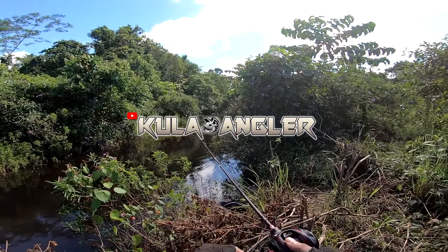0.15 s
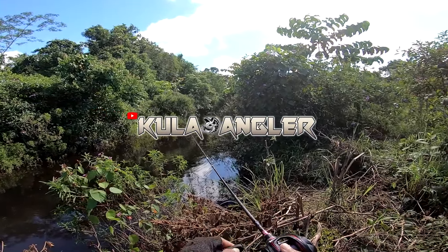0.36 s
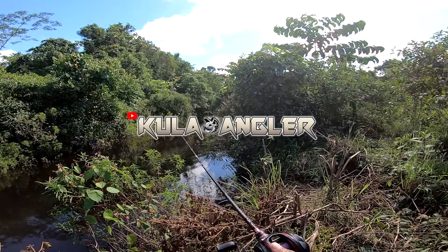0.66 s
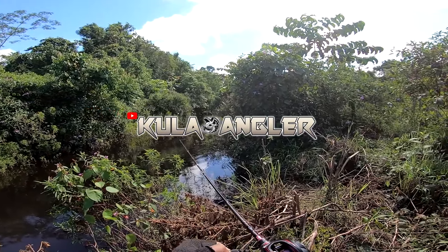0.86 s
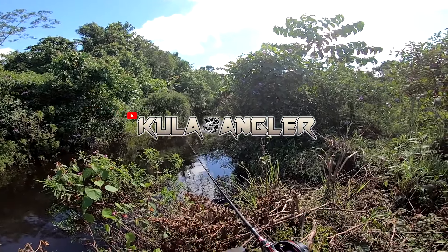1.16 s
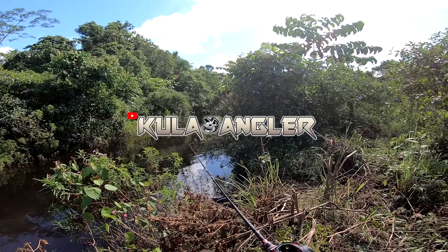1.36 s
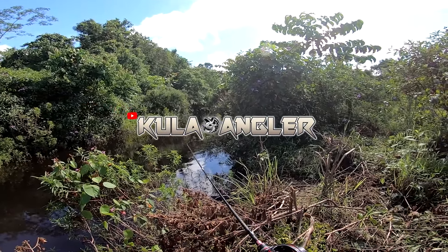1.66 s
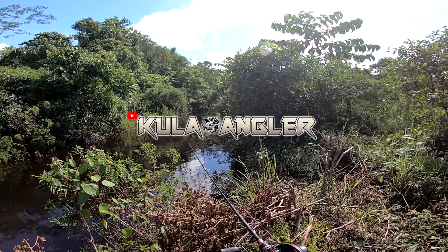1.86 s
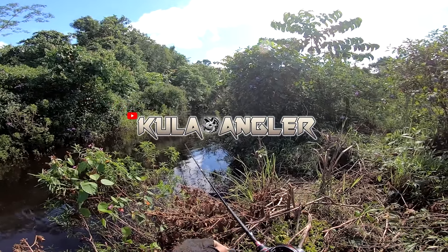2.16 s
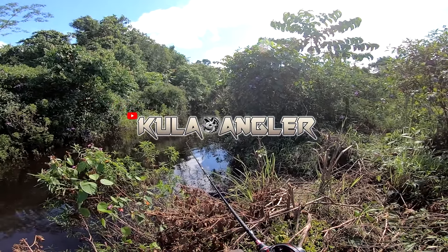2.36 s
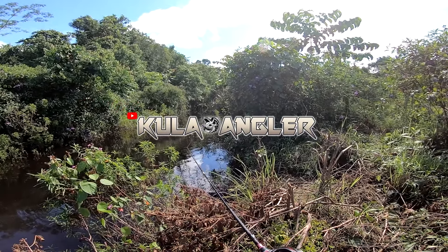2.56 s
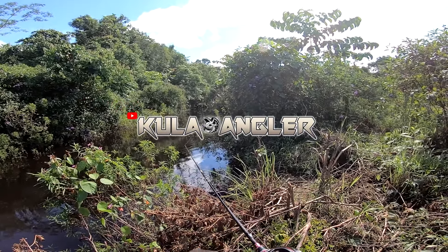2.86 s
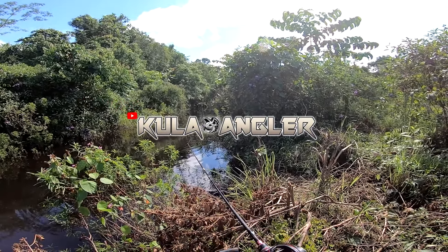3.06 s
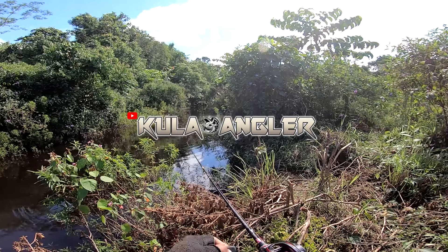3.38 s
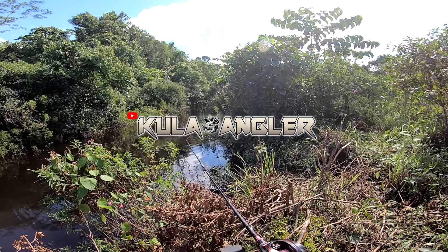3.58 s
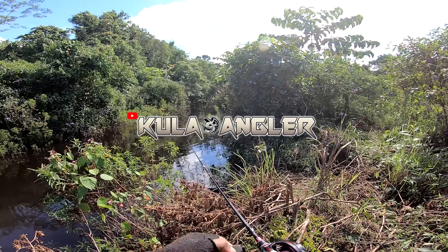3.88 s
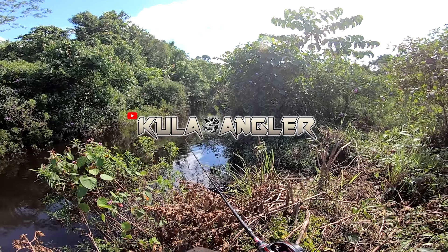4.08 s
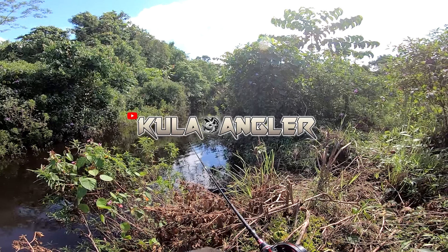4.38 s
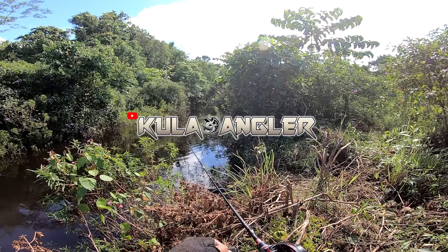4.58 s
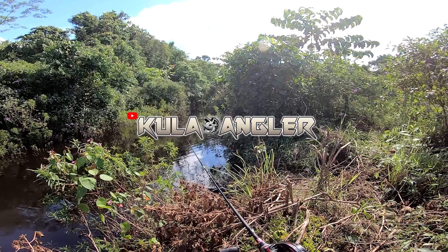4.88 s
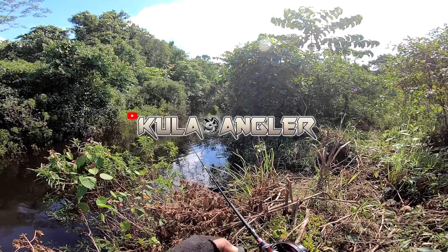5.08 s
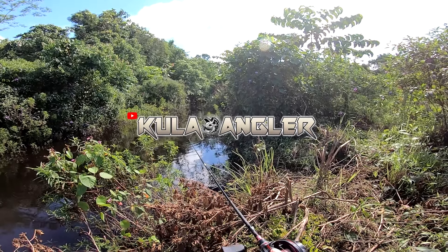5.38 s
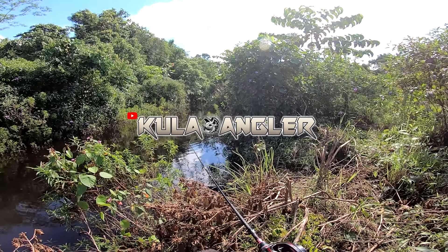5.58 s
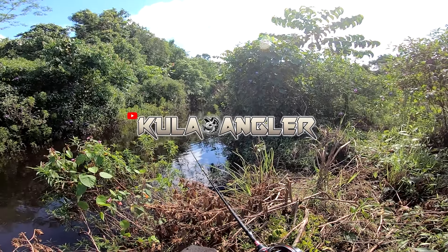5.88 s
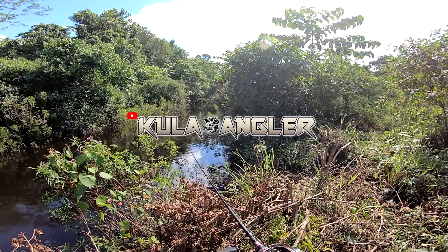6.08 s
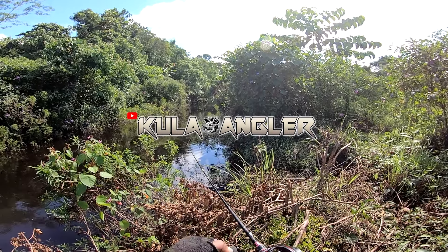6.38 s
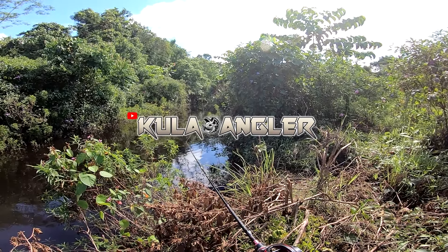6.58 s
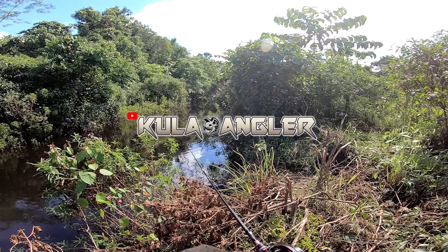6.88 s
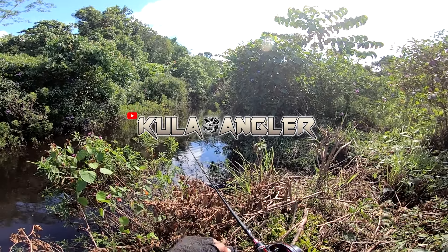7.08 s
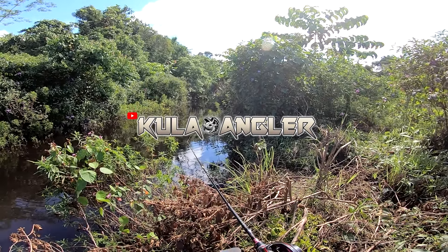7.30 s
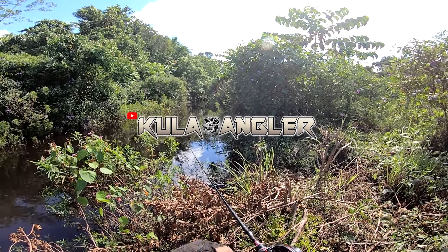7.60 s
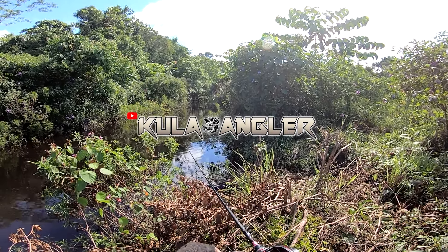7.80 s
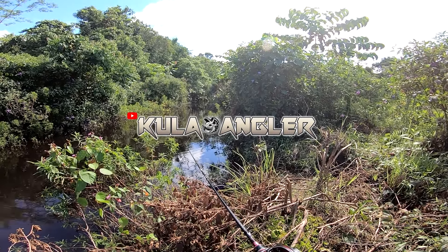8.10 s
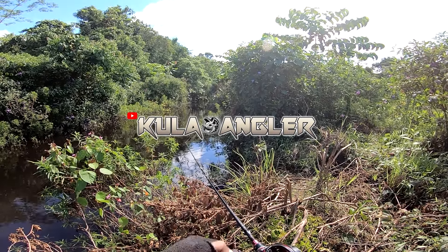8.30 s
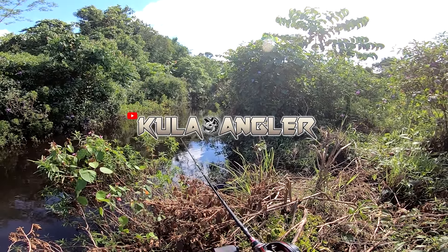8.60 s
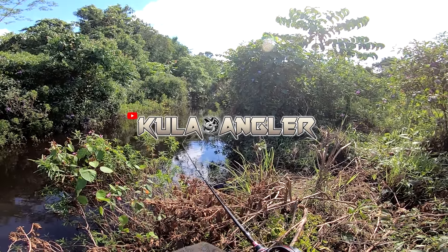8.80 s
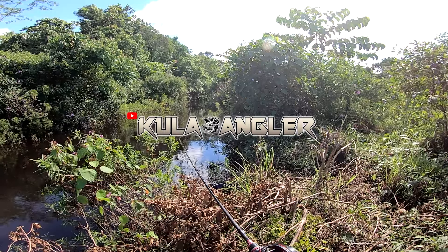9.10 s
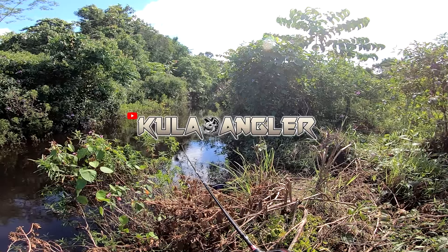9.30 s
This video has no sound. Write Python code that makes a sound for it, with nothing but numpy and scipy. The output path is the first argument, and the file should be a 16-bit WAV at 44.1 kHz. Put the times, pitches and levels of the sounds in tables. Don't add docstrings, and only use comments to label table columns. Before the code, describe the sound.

Shrill insects shimmer continuously beside still water while a fishing reel clacks, drops plink, a frog chirps evenly, birds chatter and handling bumps the camera.

```python
import sys
import numpy as np
from scipy import signal
from scipy.fft import rfft, irfft, next_fast_len
from scipy.io import wavfile

SR = 44100
rng = np.random.default_rng(int(sys.argv[2]) if len(sys.argv) > 2 else 0)


def wav_out(sig):
    wavfile.write(sys.argv[1], SR, np.round(np.clip(np.atleast_2d(sig).T, -1, 1) * 32767).astype(np.int16))


def makeup_ratio(level_db):
    decades = np.asarray(level_db, float) / 20
    return 10 ** decades


N = 416744
T = np.arange(N) / SR

# pitch in Hz, time to fade by 60 dB in s, left in dB, right in dB.
CHORUS_TONES = [(6800, 0.0093, -9.5, -28), (6870, 0.0088, 6.5, -30), (6870, 0.02, 4.5, -18),
                (7080, 0.0098, -1, 0.5), (7243, 0.017, 1.5, -9), (7650, 0.0026, 4.5, -2.5),
                (7796, 0.0055, -6, -27)]
# time in s, throb number.
THROB_TIMES = [(0, 0.5), (2.0, 40.46), (4.75, 95.0), (6.25, 124.93), (6.75, 134.72), (9.45, 188.58)]
# pitch in Hz, level in dB per Hz.
FAR_INSECT_COLOUR = [(3300, -16), (4100, -8), (4700, -4), (5200, -2.1), (5900, -4), (6300, -9), (8000, -1),
                     (8500, -6), (9500, -7), (9800, -11), (10400, -27), (11200, -34)]
# start in s, length in s, level in dB.
SIZZLE_BOUTS = [(0, 0.45, -93), (1.6, 0.22, -95), (2.3, 0.89, -98), (3.57, 0.7, -101), (4.68, 0.48, -102),
                (5.24, 0.08, -91), (5.5, 0.15, -100), (5.78, 0.055, -93), (5.97, 0.27, -101),
                (6.45, 0.4, -102), (6.95, 0.14, -94), (7.4, 0.51, -91), (8.53, 0.33, -93), (9.0, 0.5, -94)]
# time in s, chirp number.
NEAR_CHIRPS = [(0.024, 0), (2.007, 30), (6.963, 105), (9.482, 143)]
# time in s, chirp number.
FAR_CHIRPS = [(0.031, 0), (9.464, 142)]
# from in s, to in s.
CHIRP_PAUSES = [
    (2.66, 2.77),
    (3.76, 3.89),
]
FROG_CALLS = [1.286, 1.628, 2.006, 2.365, 2.736, 3.09, 3.464, 3.82, 4.184, 4.551, 4.912, 5.279, 5.667,
              6.037, 6.413, 6.784, 7.156, 7.524, 7.916, 8.301, 8.67, 9.052, 9.417]
# time in s, level in dB, centre pitch in Hz.
AHEAD_NOTES = [(0.02, -54, 2700), (0.115, -50, 3050), (0.132, -51, 2450), (0.2, -52, 3150),
               (0.3, -49.5, 3020), (0.4, -48, 3020), (0.54, -53.5, 3050), (0.565, -52, 3150),
               (0.653, -50, 3030), (0.771, -50, 3050), (0.9, -51, 3200), (4.988, -49, 2250)]
# time in s, level in dB, centre pitch in Hz.
RIGHT_NOTES = [(4.571, -52, 2530), (4.67, -49.5, 2470), (4.775, -48.5, 2490), (4.877, -44, 2660),
               (4.95, -44, 2660), (5.068, -46, 2320), (5.161, -42, 2570), (5.245, -44.5, 2520),
               (5.285, -55, 3100), (5.348, -46, 2360), (5.436, -44, 2570), (5.545, -43.5, 2480),
               (5.635, -46.5, 2410), (5.703, -47, 2670), (5.832, -50.5, 2460), (5.965, -48.5, 2560),
               (6.13, -49, 2710), (6.349, -55, 2630)]
# time in s, level in dB, centre pitch in Hz.
LEAF_RUSTLES = [(0.02, -59, 3100), (0.29, -56.5, 3000), (0.72, -58, 2000), (1.55, -63, 1113),
                (9.1, -61, 1495), (8.6, -70, 1300), (8.57, -61, 2730), (8.78, -58, 2600),
                (8.84, -58.5, 1600), (9.4, -57.5, 2700), (6.3, -73, 1400)]
# time in s, pitch in Hz, level in dB.
HOOT_GLIDE = [(0.42, 260, -71), (0.47, 287.4, -50), (0.55, 307.3, -52.5), (0.64, 292, -63),
              (0.72, 287, -64), (0.88, 284.4, -68), (0.93, 290, -55), (0.99, 278.6, -75)]
# time in s, peak in dB, pitch in Hz.
WATER_DROPS = [(1.305, -31, 734), (1.317, -32.5, 656), (1.343, -36.5, 620), (1.372, -39.5, 705),
               (1.45, -40.5, 816), (1.498, -42, 950), (1.63, -33.5, 810), (1.686, -38.5, 980),
               (1.699, -35, 820), (1.715, -34.5, 720), (1.762, -30.5, 754), (1.775, -39, 820),
               (1.87, -44, 706), (1.97, -40, 820), (1.986, -39, 960), (2.226, -44.5, 1390),
               (3.939, -52, 610), (5.829, -46, 1830), (7.659, -43.5, 1186), (8.868, -45, 2020),
               (7.512, -44, 900), (1.909, -44, 1050), (1.93, -55, 1040)]
# start in s, length in s, level in dB, first Hz, last Hz.
PIPE_GLIDES = [
    (1.495, 0.037, -51, 910, 980),
    (1.635, 0.037, -49, 883, 780),
    (2.246, 0.035, -60, 2060, 2080),
    (2.303, 0.12, -53.5, 402, 390),
    (8.553, 0.02, -56, 960, 980),
    (8.58, 0.024, -54, 990, 1010),
    (8.772, 0.062, -61, 956, 1070),
    (8.813, 0.071, -57, 1790, 2100),
]
# time in s, peak in dB, ring in Hz.
LATCH_CLICKS = [(0.2292, -25.5, 820), (0.23, -30, 1520), (0.256, -30, 2900), (0.2659, -12.5, 2700),
                (0.267, -11.5, 2760), (0.2671, -15.5, 1680), (0.2753, -31, 2900), (0.2774, -11.5, 2580),
                (0.2776, -28, 1820), (0.262, -34, 2600), (0.2688, -24, 2900), (0.2722, -26, 2900),
                (0.2746, -21, 2900), (0.2845, -43, 2300), (0.2859, -29, 3280), (0.2674, -17, 6800),
                (0.2696, -12, 6800), (0.2675, -23, 3950), (0.269, -21, 4660), (0.3362, -24, 2940),
                (0.3382, -20.5, 2920), (0.3390, -25.5, 810), (0.34, -28.5, 1810), (0.353, -27, 303),
                (0.2660, -31, 376)]
# start in s, length in s, level in dB.
LEVER_SCRAPES = [
    (0.246, 0.039, -40.5),
    (0.263, 0.01, -29),
    (0.285, 0.039, -55),
]
# pitch in Hz, level in dB, time to fade by 60 dB in s.
REEL_TONES = [(1630, 8.5, 0.0015), (2300, 5, 0.0032), (2900, -0.5, 0.0067), (3950, -2, 0.0038),
              (6700, -5, 0.0019), (9400, -15, 0.0042), (11300, -13.5, 0.005)]
# time in s, peak in dB, pitch in Hz, left minus right in dB.
HARD_TICKS = [(1.887, -39, 1820, 16), (1.8873, -43, 3000, 3), (3.639, -45, 2710, 3.5),
              (3.721, -41, 2670, 3.0), (4.04, -46, 3800, 1), (2.74, -49, 3100, 2), (6.7694, -42, 4300, 4),
              (6.7696, -42, 2600, 4), (4.31, -40, 4160, 2), (4.3566, -37.5, 5000, 13),
              (5.2273, -49, 5300, 0), (5.525, -38, 3550, -4.0), (6.769, -41, 3300, 4),
              (2.0996, -39, 322, 3), (8.125, -56, 4600, -8), (8.743, -54, 4800, 2.1),
              (6.7692, -42, 5500, 5)]
# time in s, peak in dB, pitch in Hz, left minus right in dB.
TWIG_SNAPS = [(8.532, -42, 2700, 2), (8.552, -42, 2860, 0), (8.574, -38, 2520, 2.5),
              (8.825, -41, 2300, 4.5), (8.89, -43, 2200, 2), (1.333, -41, 1700, 0), (1.375, -42, 2400, 0),
              (8.741, -42, 2100, 7), (8.767, -39, 2590, 3.5), (8.798, -40, 2600, 5), (8.87, -40, 2700, 1.5),
              (8.91, -51, 2700, 2.5), (9.086, -44, 3500, 1.1), (9.384, -40, 2800, 0.6),
              (8.201, -45, 2400, 0.6), (7.707, -46, 2640, 0.6), (4.941, -40, 2550, -7),
              (7.256, -46, 1390, 3), (5.607, -42, 2400, -3), (3.336, -43, 2600, 0), (3.23, -46, 2300, 0),
              (3.288, -46, 1900, 0), (6.96, -50, 1600, 2)]
# time in s, peak in dB.
CASE_KNOCKS = [
    (2.099, -12),
    (4.357, -8.5),
    (5.227, -11),
]
# time in s, length in s, level in dB.
CLOTH_RUBS = [(2.273, 0.032, -55), (2.693, 0.052, -65), (3.092, 0.042, -68), (3.227, 0.1, -58),
              (3.462, 0.24, -64), (3.69, 0.068, -49.5), (4.184, 0.082, -62), (4.35, 0.084, -55),
              (4.5, 0.051, -74), (4.877, 0.031, -57), (4.988, 0.05, -53.5), (5.268, 0.066, -35),
              (6.152, 0.16, -70), (6.759, 0.14, -56), (6.968, 0.078, -50), (7.536, 0.065, -51),
              (7.74, 0.095, -53.5), (8.572, 0.065, -51), (9.243, 0.074, -56), (9.375, 0.12, -50)]
# pitch in Hz, level in dB, time to fade by 60 dB in s.
CASE_TONES = [(423, -11, 0.02), (990, 1, 0.016), (1600, -26, 0.04), (1660, -9.5, 0.0028),
              (2280, -23, 0.029), (2920, -15.5, 0.015)]
# time in s, peak in dB, pitch in Hz.
FINGER_THUMPS = [(0.11, -47, 65), (0.249, -49, 80), (0.36, -44.5, 75), (0.84, -55, 45), (1.09, -57, 75),
                 (1.32, -52, 85), (1.66, -55, 95), (1.79, -46, 75), (2.06, -56, 55), (2.12, -47, 75),
                 (2.44, -52, 45), (3.56, -55, 80), (3.95, -52, 70), (5.1, -61, 50), (5.28, -54, 60),
                 (5.76, -49, 60), (6.13, -50, 55), (7.25, -52, 55), (7.45, -51, 65), (7.81, -54, 50),
                 (7.98, -45, 70), (8.35, -51, 60), (8.77, -47, 56.4), (9.079, -47, 50), (9.33, -47, 50.4)]
# time in s, level in dB.
MOTOR_LEVEL = [(0, -55.5), (0.1, -56), (0.5, -55.5), (1.05, -58.5), (1.22, -62), (1.32, -52.5),
               (1.52, -55.5), (1.8, -55.5), (2.1, -55), (2.45, -58.5), (2.55, -65.5), (3.18, -64),
               (3.84, -63), (4.4, -70), (5.0, -68.5), (5.87, -70.5), (6.3, -76.5), (9.45, -70.5)]
# pitch in Hz, level in dB per Hz.
LOW_AIR_COLOUR = [(59, -48), (112, -5.5), (152, 2.5), (444, -8), (713, -5), (932, -14.5), (1300, -14.5),
                  (1690, -21.5), (2860, -120)]
# pitch in Hz, level in dB per Hz.
HIGH_AIR_COLOUR = [(530, -3), (900, 0.5), (1140, -1.5), (1310, 3.5), (2120, -1.5), (2380, 0), (2670, 4),
                   (4200, -14.5), (5460, -30), (9240, -120)]
# pitch in Hz, likeness from 0 to 1.
AIR_LIKENESS = [(60, .95), (150, 0.76), (400, 0.67), (800, 0.39), (1300, 0.14), (2700, 0.75), (3900, 0.54),
                (4700, 0.7), (6000, 0.046)]
# pitch in Hz, left minus right in dB.
AIR_LEAN = [(200, -0.5), (700, -3), (1300, 0), (2500, 2.5), (4000, -0.5), (5200, 7.5), (8800, 7),
            (10000, -5), (12000, -21)]
# time in s, level in dB.
WIND_GUSTS = [(0.1, -65), (0.35, -66), (1.1, -75), (1.79, -71), (2.11, -64), (2.45, -81), (3.1, -66),
              (3.53, -68), (3.97, -59), (4.4, -64), (5.26, -60), (5.76, -60), (6.1, -60), (6.65, -57.5),
              (7.21, -60), (7.7, -59.5), (7.98, -66), (8.37, -55), (8.76, -58.5), (9.14, -51),
              (9.34, -62.5)]
# time in s, side level in dB.
STEREO_OPENING = [
    (0, -36.5),
    (1.85, -35.5),
    (2.0, -13.5),
    (2.2, -6.5),
    (2.6, -4),
    (3.4, -0.5),
    (9.45, 0.5),
]
# pitch in Hz, level in dB.
WIND_MODE_COLOUR = [(650, 0.63), (1050, 0), (1600, 3), (3000, 4.5), (4200, 7), (5200, -2), (5700, -2),
                    (5950, -0.5), (6600, -1.2), (8800, 0.1), (9200, 4), (9600, 2.5), (10600, 10.5),
                    (11200, 3)]


def rms_one(x):
    return x / np.sqrt(np.mean(x ** 2) + 1e-20)


def in_time(rows):
    s, *columns = np.transpose(rows)
    return [np.interp(T, s, column) for column in columns]


def at_hz(points, hz):
    table_hz, value = np.array(points)[:, 0], np.array(points)[:, 1]
    return np.interp(np.log(hz), np.log(table_hz), value)


def drift(rate):
    step = 40
    r = np.exp(-2 * np.pi * step * rate / SR)
    noise = rng.standard_normal(N // step + 2002)
    slow = signal.lfilter([1], [1, -2 * r, r * r], noise)[2000:]
    return np.interp(np.arange(N) / step, np.arange(len(slow)), rms_one(slow))


def low_pass(x, hz):
    return signal.sosfilt(signal.butter(4, min(hz, .45 * SR), fs=SR, output="sos"), x)


def band_pass(x, order, low_hz, high_hz):
    return signal.sosfilt(signal.butter(order, [low_hz, high_hz], "band", fs=SR, output="sos"), x)


def ring(clicks, hz, t60):
    r, w = makeup_ratio(-60 / (t60 * SR)), 2 * np.pi * hz / SR
    return signal.lfilter([0, np.sin(w)], [1, -2 * r * np.cos(w), r * r], clicks + 1e-18)


def add(out, s, sound, lean_db=0):
    i = int(np.clip(s * SR, 0, N))
    out[:, i:i + len(sound)] += sound[:N - i] * makeup_ratio(np.array([[lean_db / 2], [-lean_db / 2]]))


def grains(per_s, spread_db, size):
    heights = makeup_ratio(spread_db * np.minimum(rng.exponential(1, size), 5)) * rng.choice([-1, 1], size)
    return heights * (rng.random(size) < per_s / SR)


def bouts(rows, edge):
    gain = 0
    for s, length, level_db in rows:
        inside = np.minimum(T - s, s + length - T) / edge + .5
        gain = gain + makeup_ratio(level_db) * np.clip(inside, 0, 1)
    return gain


def chorus(level_db):
    out = np.zeros((2, N))
    octave_band = signal.cheby1(4, 1, [13650, 15000], "band", fs=SR, output="sos")
    for side, throb_depth in enumerate([0.13, 0.27]):
        throb = 2 * np.pi * (in_time(THROB_TIMES)[0] + .02 * drift(1.0))
        strokes = 1 + 0.075 * np.cos(4 * throb + 4.1) + 0.09 * np.cos(8 * throb + 1.9)
        buzz = (1 + throb_depth * np.cos(throb)) * strokes
        clicks = grains(1400, 2.0, N) + .5 * rng.standard_normal(N)
        for k, (hz, t60, *gain_db) in enumerate(CHORUS_TONES):
            twice = ring(ring(clicks, hz, t60), hz, t60)
            out[side] += (-1) ** k * makeup_ratio(gain_db[side]) * rms_one(twice)
        out[side] = buzz * low_pass(low_pass(out[side], 9000), 9000)
        octave = rms_one(signal.sosfilt(octave_band, clicks))
        out[side] += makeup_ratio([-31.0, -22.0][side] + 1.1 * drift(3.2)) * octave
    return makeup_ratio(level_db) * out / np.sqrt(np.mean(out.mean(0) ** 2))


def sizzle():
    hiss = rms_one(band_pass(rng.standard_normal((2, N)), 4, 10400, 12500))
    return (makeup_ratio(-107) + bouts(SIZZLE_BOUTS, edge=0.055)) * makeup_ratio(5.5 * drift(14.0)) * hiss


def cricket(beats, hz, duty, fall_hz, ragged_db):
    turn = (np.interp(T, *np.transpose(beats)) + .5) % 1 - .5
    shape = np.cos(np.pi / 2 * np.clip(2 * turn / duty, -1, 1)) * makeup_ratio(ragged_db * drift(12.0))
    pitch = hz - fall_hz * turn + 12 * drift(21.7)
    return rms_one(shape * np.sin(2 * np.pi * np.cumsum(pitch) / SR))


def frog(level_db, length, fall_hz):
    out, u = np.zeros((2, N)), np.linspace(0, 1, int(length * SR))
    pitch = 3180 + fall_hz * (1 - u) ** 1.5
    note = np.sin(np.pi * u ** .7) * np.sin(2 * np.pi * np.cumsum(pitch) / SR)
    chances = rng.standard_normal((len(FROG_CALLS), 5))
    for s, (change_db, *echoes) in zip(FROG_CALLS, chances):
        add(out, s - length / 2, makeup_ratio(level_db + 1.5 * change_db) * note, 4.0)
        for k, echo in enumerate(echoes):
            add(out, s + .03 + .03 * k + .004 * echo, makeup_ratio(level_db - 5 - 2.0 * k) * note, 2 * echo)
    return out * makeup_ratio(3.0 * drift(80.0))


def answer(level_db, delay, length):
    swell = sum(np.exp(-((T - s - delay) / length) ** 2) for s in FROG_CALLS)
    hoarse = ring(ring(rng.standard_normal((2, N)), 4870, 0.011), 4870, 0.011)
    return makeup_ratio(level_db) * swell * rms_one(hoarse) * makeup_ratio([[2.5], [-2.5]])


def chatter(rows, length, slide, rasp_hz, lean_db, breathy, tail=3):
    out, size = np.zeros((2, N)), int(tail * length * SR)
    u = np.arange(size) / (length * SR)
    through = np.clip(u, 0, 1)
    voice = np.sin(np.pi * through ** .75) ** 1.5
    echo = .6 * np.clip(2 * u, 0, 1) * np.exp(-u / 3) * (1 - u / tail)
    for s, level_db, hz in rows:
        pulses = grains(760, 4.5, (2, size)) + breathy * rng.standard_normal((2, size))
        rasp = rms_one(low_pass(pulses, rasp_hz)) + .3
        phase = 2 * np.pi * np.cumsum(hz * (1 + slide * (.5 - through))) / SR
        note = rms_one(rasp[0] * np.sin(phase) + rasp[1] * np.cos(phase))
        add(out, s - length / 2, makeup_ratio(level_db) * (voice + echo) * note, lean_db)
    return out


def hoot():
    hz, level_db = in_time(HOOT_GLIDE)
    phase = 2 * np.pi * np.cumsum(hz + 4.2 * drift(19.6)) / SR
    return makeup_ratio(level_db) * (np.sin(phase) + 1.05 * np.sin(2 * phase)) * (T < HOOT_GLIDE[-1][0])


def drips():
    out, t = np.zeros((2, N)), T[:3000]
    push = 0.75 * np.exp(-((t - .001) / 0.00049) ** 2)
    for s, peak_db, hz in WATER_DROPS:
        bubble = np.sin(2 * np.pi * hz * t * (1 + 4.5 * t)) * makeup_ratio(-60 * t / 0.05)
        add(out, s, makeup_ratio(peak_db) * (bubble * np.minimum(t / 0.003, 1) - push))
    return out


def glides(rows):
    out = np.zeros((2, N))
    for s, length, level_db, first_hz, last_hz in rows:
        u = np.linspace(0, 1, int(length * SR))
        phase = 2 * np.pi * np.cumsum(first_hz + (last_hz - first_hz) * u) / SR
        add(out, s, makeup_ratio(level_db) * np.sin(np.pi * u ** 0.72) * np.sin(phase))
    return out


def thumps():
    length = 0.055
    return glides([(s - length / 2, length, peak_db, 1.185 * hz, 0.83 * hz) for s, peak_db, hz in FINGER_THUMPS])


def contacts(rows, crack_gain, crack_hz):
    out, t = np.zeros((2, N)), T[:900]
    for s, peak_db, hz, *lean_db in rows:
        body = np.sin(2 * np.pi * hz * t) * np.exp(-t * max(hz, 1200) / 2.3) * np.minimum(t / .0006, 1)
        burst = rng.standard_normal(len(t)) * np.exp(-t / 0.0021)
        crack = low_pass(burst, crack_hz + 26000 * makeup_ratio(peak_db))
        add(out, s, makeup_ratio(peak_db) * (1.3 * body + crack_gain * crack), sum(lean_db))
    return out


def twigs():
    out, t = np.zeros((2, N)), T[:900]
    for s, peak_db, hz, lean_db in TWIG_SNAPS:
        crack = low_pass(rng.standard_normal(len(t)) * np.exp(-t / .002), 3000)
        snap = np.sin(2 * np.pi * hz * t) * np.exp(-t * hz / 3) + .35 * crack
        add(out, s, makeup_ratio(peak_db) * snap * np.minimum(t / .0006, 1), lean_db)
    return out


def lever():
    slips = grains(3400, 3.1, SR // 2)
    frame = 0
    for k, (hz, gain_db, t60) in enumerate(REEL_TONES):
        frame = frame + (-1) ** k * makeup_ratio(gain_db) * ring(slips, hz, t60)
    out = np.zeros(N)
    out[:SR // 2] = rms_one(frame)
    return out * bouts(LEVER_SCRAPES, edge=0.012)


def housing():
    knocks, stroke = np.zeros(N), np.full(N, makeup_ratio(-63.0))
    for s, peak_db in CASE_KNOCKS:
        knocks[int(s * SR)] = makeup_ratio(peak_db)
    for s, length, level_db in CLOTH_RUBS:
        stroke += makeup_ratio(level_db) * np.exp(-((T - s) / (0.46 * length)) ** 4)
    scratch = grains(5000, 1.8, N)
    cloth = ring(scratch, 990, 0.012) - 0.81 * ring(scratch, 1450, 0.0082)
    cloth += 0.39 * ring(scratch, 2500, 0.0039) - 0.095 * ring(scratch, 5900, 0.0023)
    soft_knocks = np.convolve(knocks, np.hanning(20) / 9)[:N]
    body = sum(makeup_ratio(gain_db) * ring(soft_knocks, hz, t60) for hz, gain_db, t60 in CASE_TONES)
    body = body + stroke * rms_one(cloth)
    body = low_pass(signal.sosfilt(signal.butter(3, 380, "high", fs=SR, output="sos"), body), 4400)
    lagging = 2.4 * np.diff(body, prepend=0)
    early = makeup_ratio(-np.maximum(in_time(STEREO_OPENING)[0], -12.0) * 0.022)
    return body * [[1], [-1]] + early * lagging


def motor(level_db):
    blur = rms_one(ring(ring(rng.standard_normal(N), 154.0, 0.15), 150.5, 0.12))
    tone = np.sin(2 * np.pi * np.cumsum(152.5 + 1.5 * drift(2.0)) / SR)
    beating = 1 + .35 * np.cos(2 * np.pi * 8.4 * (T - .6))
    return makeup_ratio(level_db) * rms_one(0.3 * blur + tone * beating)


def air(spectrum, patchy_db):
    size = next_fast_len(N)
    hz = np.maximum(np.fft.rfftfreq(size, 1 / SR), 1)
    inside = (hz > spectrum[0][0]) & (hz < spectrum[-1][0])
    noise = rfft(rng.standard_normal((2, size))) * makeup_ratio(at_hz(spectrum, hz)) * inside
    alike = np.clip(at_hz(AIR_LIKENESS, hz), -1, 1)
    lean_db = at_hz(AIR_LEAN, hz) * [[.5], [-.5]]
    shared, apart = np.sqrt(1 + alike) * noise[0], np.sqrt(1 - alike) * noise[1]
    pair = (shared + apart * [[1], [-1]]) * makeup_ratio(lean_db)
    out, together, place = 0, drift(0.27), 2 * np.log2(hz)
    for k in range(int(place[inside][0]), int(place[inside][-1]) + 2):
        band = irfft(pair * np.sqrt(np.clip(1 - abs(place - k), 0, 1)), size)[:, :N]
        out = out + band * makeup_ratio(patchy_db * (together / 3 + drift(8.7)))
    return rms_one(out)


def stirred(calm_db, wash_db, follows, gust_db, swing_db, gust):
    return makeup_ratio(calm_db) + makeup_ratio(wash_db + follows * swing_db) + makeup_ratio(gust_db) * gust


def gusts():
    gain = makeup_ratio(-67)
    for s, level_db in WIND_GUSTS:
        spread = np.where(T < s, 0.14, 0.18)
        gain = gain + makeup_ratio(level_db) * np.exp(-((T - s) / spread) ** 2)
    return gain


def wind(gain):
    lumps = rng.standard_normal((2, N)) * makeup_ratio(2.2 * drift(5.2))
    mid, side = band_pass(lumps, 2, 42, 80)
    mid = mid + makeup_ratio(-2.0) * (T / 9) * band_pass(lumps[0], 2, 98, 135)
    return makeup_ratio(-2.0) * gain * rms_one(mid + makeup_ratio(-16.0) * side * [[1], [-1]])


def scene():
    chorus_db = -60 + 0.2 * T - 2.5 * np.exp(-((T - 2.2) / 0.63) ** 2)
    cricket_db = np.interp(T, [0, 2.5], [-90, -66])
    cricket_db = cricket_db - 14 * sum((T > s) & (T < end) for s, end in CHIRP_PAUSES)
    motor_db, gust = in_time(MOTOR_LEVEL)[0], gusts()
    swing_db = motor_db - motor_db.mean()
    low = stirred(-66.5, -50.5 - 10.5, 0.89, -12.5, swing_db, gust)
    high = stirred(-59, -66 - 14.5, 0.76, -16, swing_db, gust)

    out = chorus(chorus_db) + sizzle()
    out += makeup_ratio(chorus_db - 7.0) * air(FAR_INSECT_COLOUR, patchy_db=1.3)
    out += makeup_ratio(cricket_db) * cricket(NEAR_CHIRPS, 7735, 0.6, 150, ragged_db=0.5) * makeup_ratio([[5.0], [-14.0]])
    out += makeup_ratio(cricket_db) * cricket(FAR_CHIRPS, 8110, .45, -60, ragged_db=2.5) * makeup_ratio([[-5.0], [-16.0]])
    out += cricket(FAR_CHIRPS, 8260, .5, 40, ragged_db=2.0) * makeup_ratio([[-84.0], [-78.0]])
    out += frog(-62, 0.044, 250) + answer(-72.5, 0.3, 0.072)
    out += chatter(AHEAD_NOTES, 0.035, 0.04, 170, lean_db=-7, breathy=.6, tail=5) * makeup_ratio(-6.0)
    out += chatter(RIGHT_NOTES, .056, 0.18, 406, lean_db=-8.0, breathy=1.0) * makeup_ratio(-7.5)
    out += chatter(LEAF_RUSTLES, .1, -.2, 650, lean_db=2, breathy=.8)
    out += hoot() + drips() + glides(PIPE_GLIDES) + thumps()
    out += contacts(LATCH_CLICKS, crack_gain=.16, crack_hz=4300) + lever()
    out += contacts(HARD_TICKS, crack_gain=.6, crack_hz=6200) + twigs() + housing()
    out += motor(motor_db) * makeup_ratio([[-.3], [.3]])
    out += low * air(LOW_AIR_COLOUR, patchy_db=2.5) + high * air(HIGH_AIR_COLOUR, patchy_db=2.0)
    return out + wind(gust)


def band_limit(x):
    return signal.sosfilt(signal.butter(12, 15830, fs=SR, output="sos"), x)


def record(dry):
    mid, side = (dry[0] + dry[1]) / 2, (dry[0] - dry[1]) / 2
    top = signal.sosfilt(signal.butter(8, 13000, "high", fs=SR, output="sos"), side)
    top += makeup_ratio(-16.0) * band_pass(side, 4, 4300, 6300)
    hz = np.fft.rfftfreq(N, 1 / SR) + 1
    coloured = irfft(rfft(mid) * makeup_ratio(at_hz(WIND_MODE_COLOUR, hz)), N)
    width = makeup_ratio(in_time(STEREO_OPENING)[0])
    mid = width * mid + (1 - width) * coloured
    side = width * side + (1 - width) * top
    treble_cut = signal.cheby2(10, 28, 15150, fs=SR, output="sos")
    mix = signal.sosfilt(treble_cut, [mid + side, mid - side])
    return band_limit(mix)


dry = scene()
out = record(dry)
wav_out(out)
```